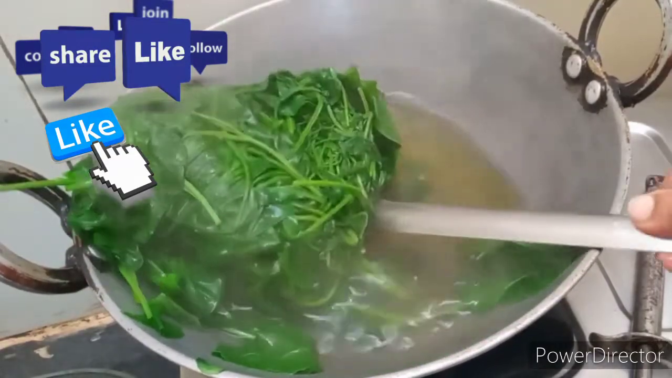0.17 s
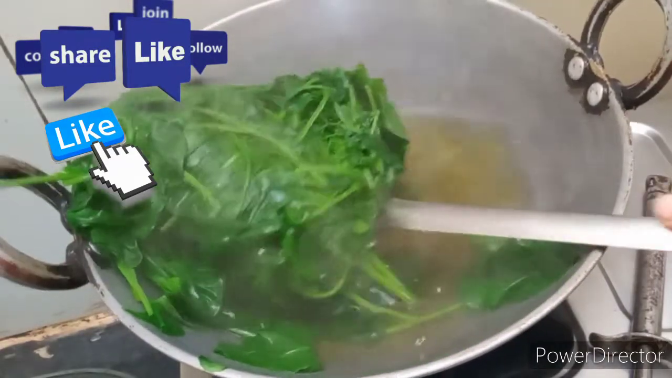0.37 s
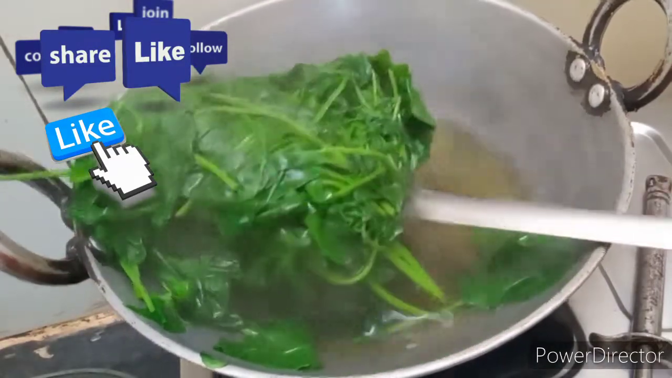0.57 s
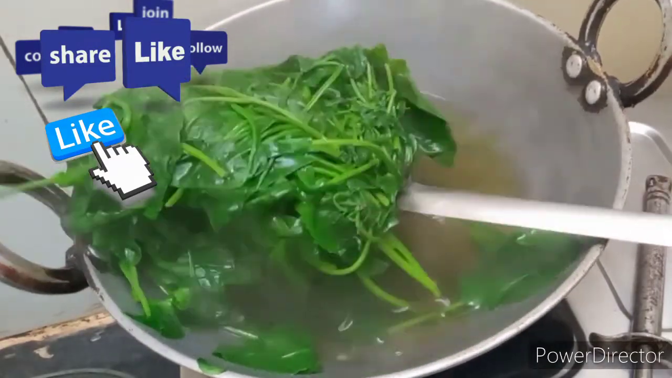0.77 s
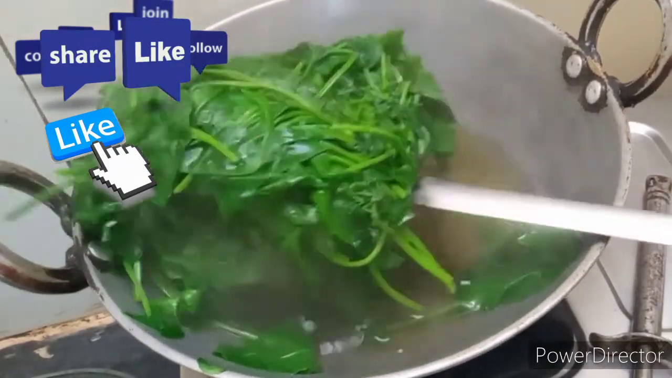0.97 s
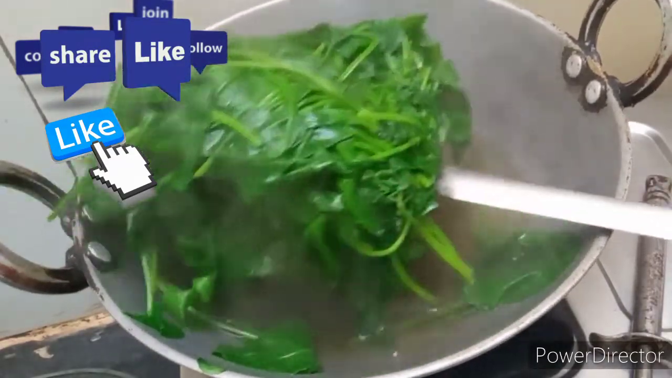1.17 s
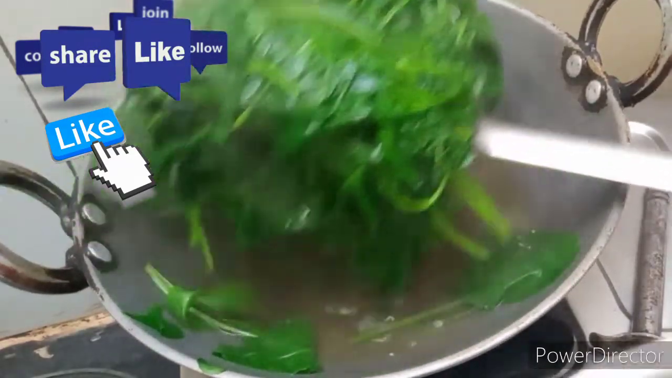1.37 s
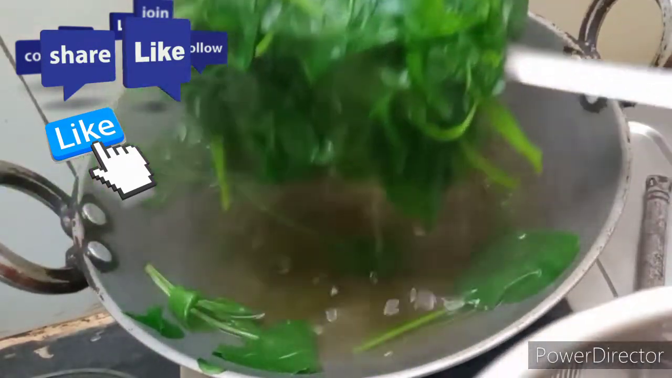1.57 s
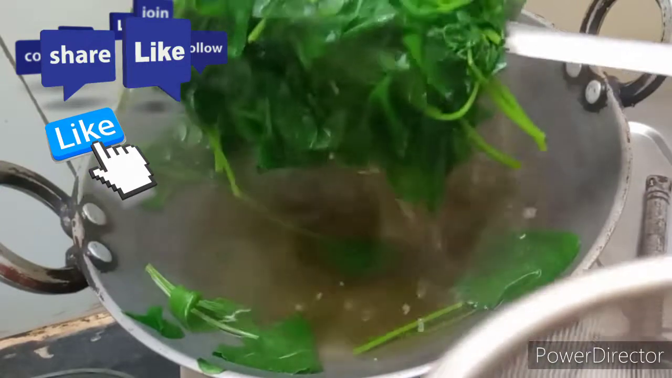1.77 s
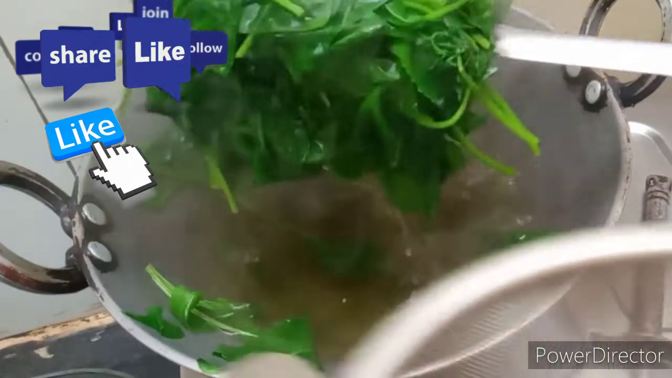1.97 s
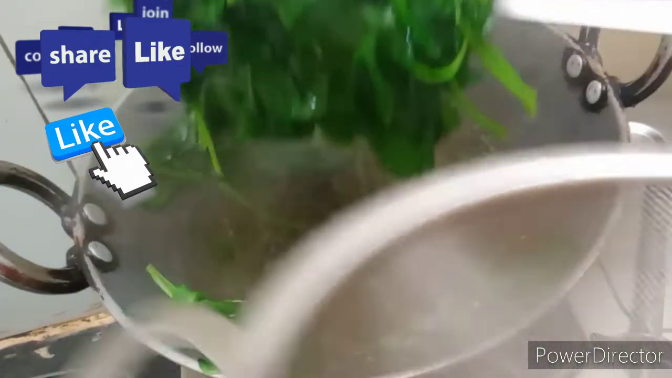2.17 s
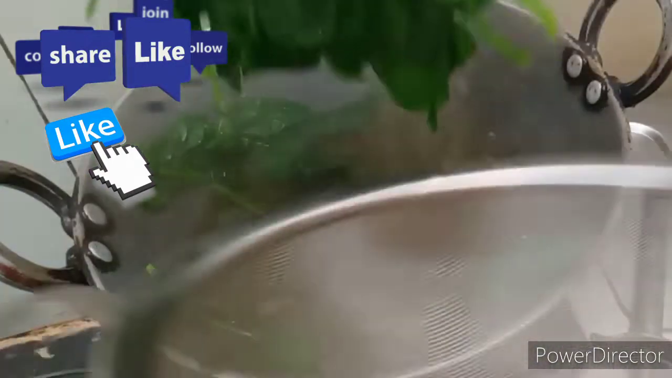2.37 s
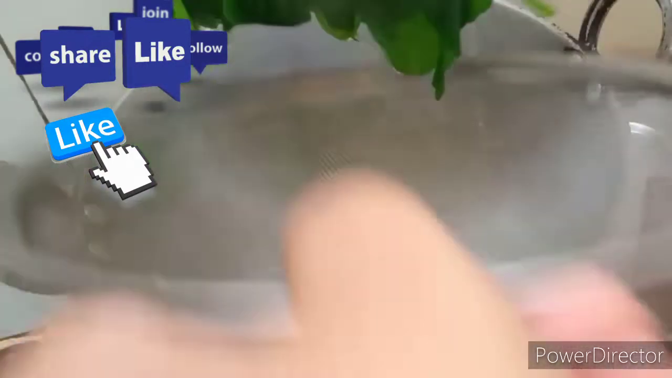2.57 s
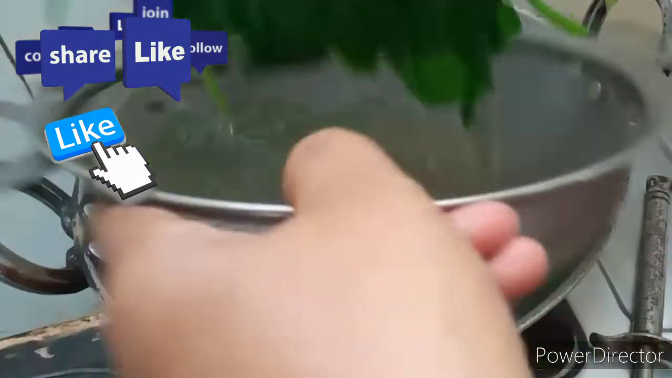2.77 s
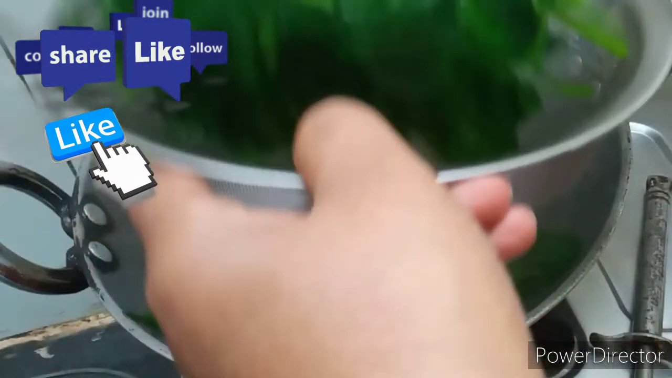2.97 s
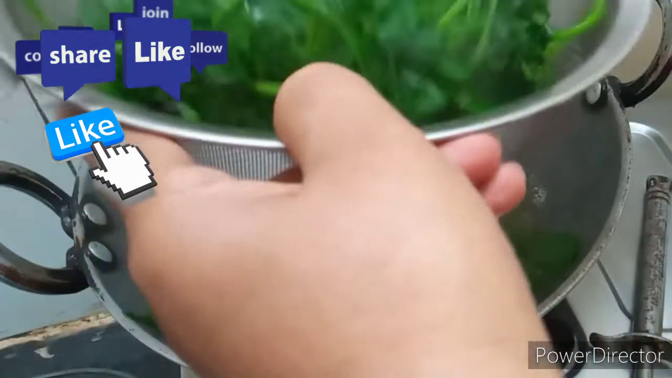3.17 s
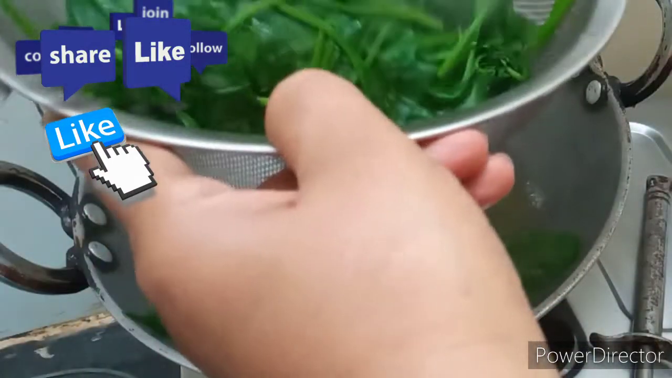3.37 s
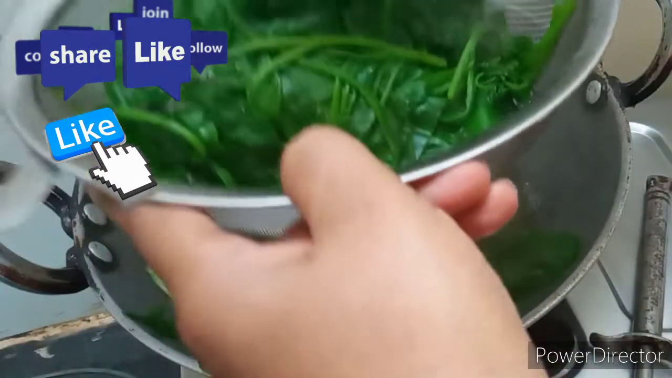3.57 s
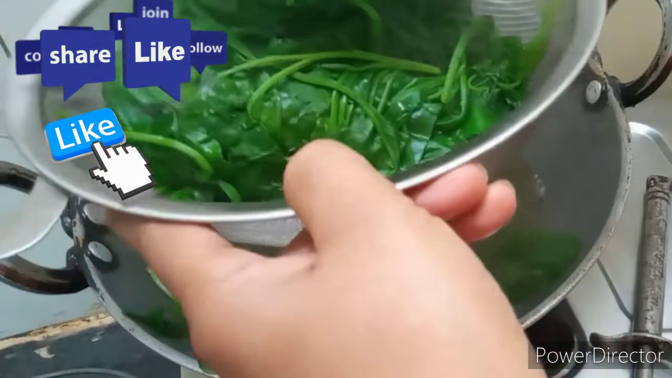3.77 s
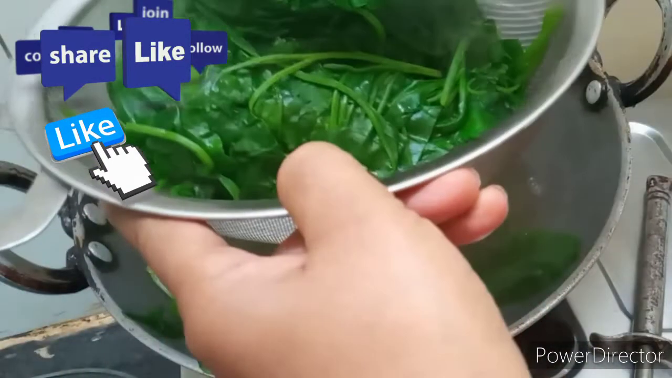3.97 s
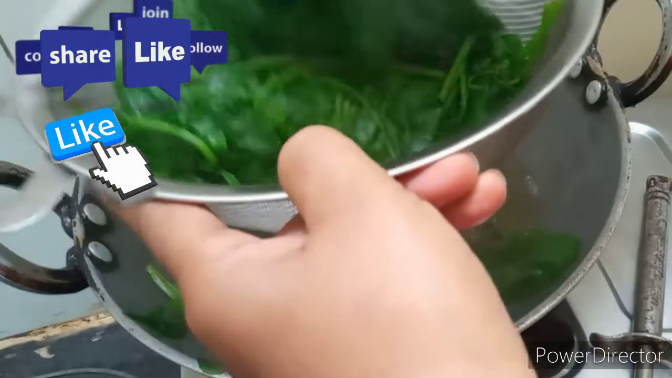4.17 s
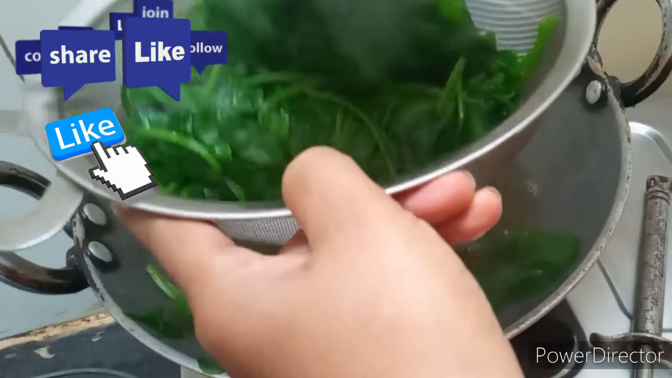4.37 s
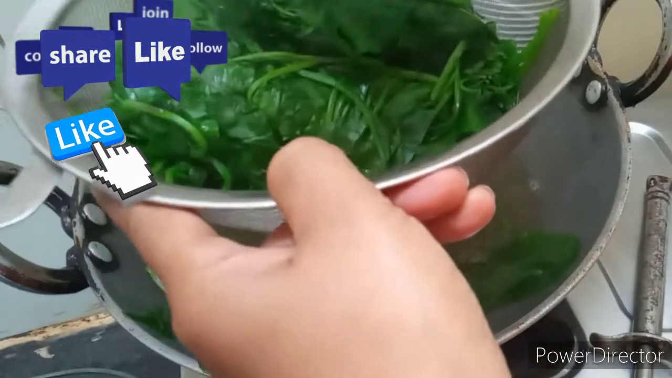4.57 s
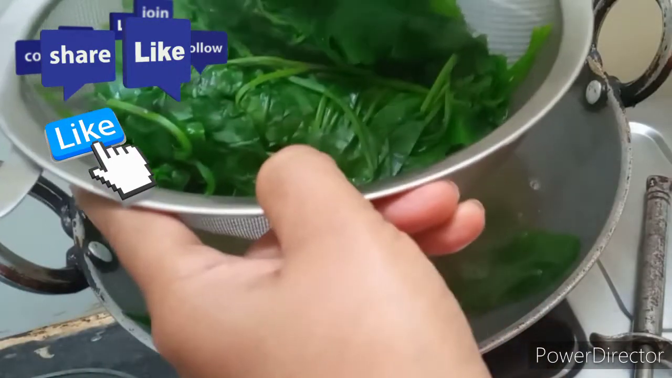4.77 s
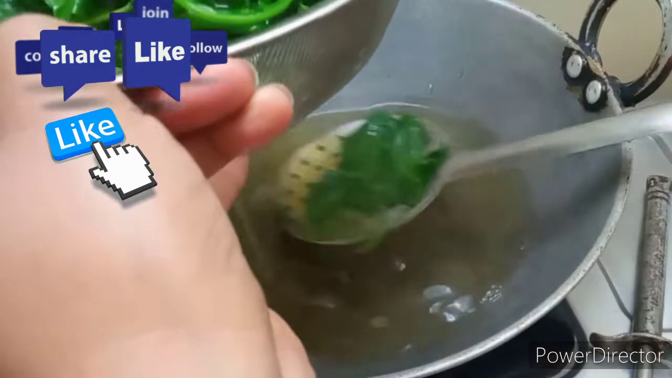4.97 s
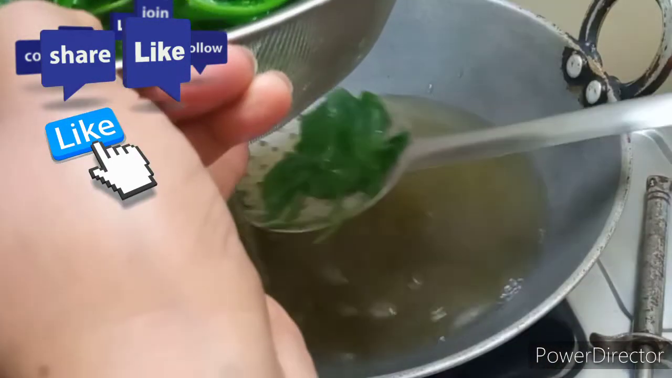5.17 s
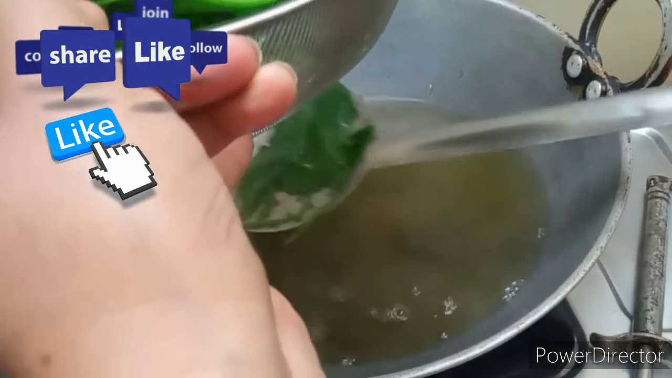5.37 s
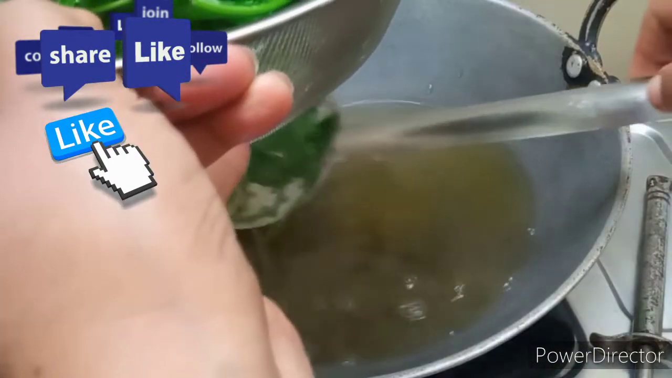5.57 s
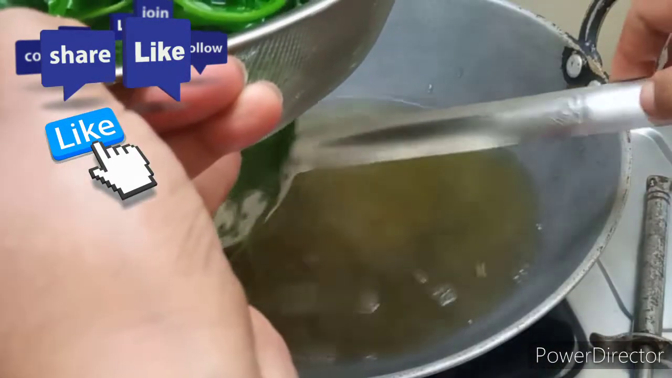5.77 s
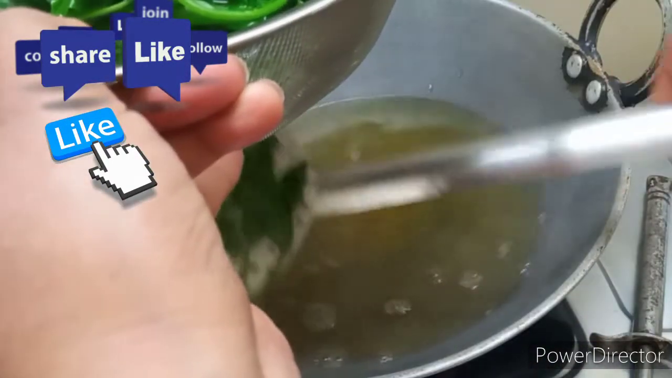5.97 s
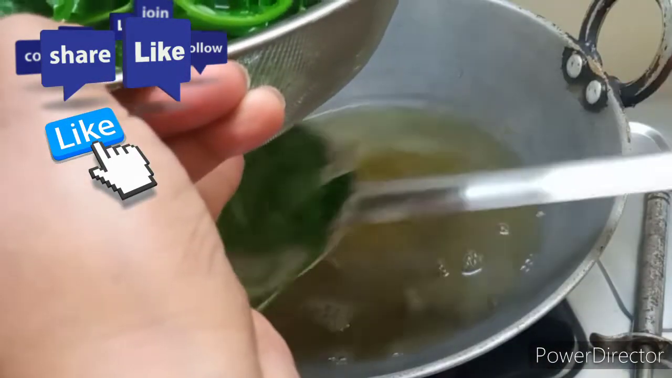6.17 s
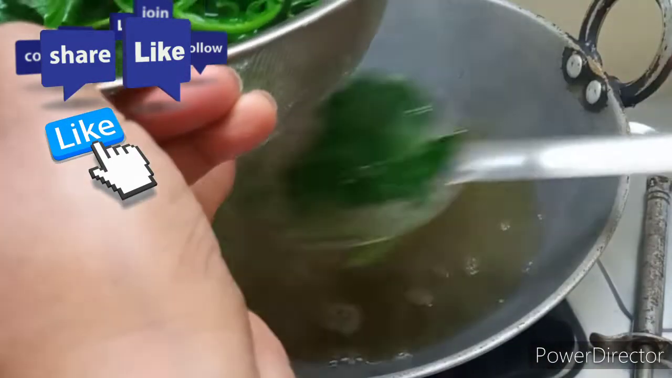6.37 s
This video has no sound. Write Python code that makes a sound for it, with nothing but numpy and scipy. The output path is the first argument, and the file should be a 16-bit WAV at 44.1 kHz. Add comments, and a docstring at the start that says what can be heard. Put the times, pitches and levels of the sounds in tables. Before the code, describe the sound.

In a small hard kitchen a stove murmurs steadily. Sodden greens slap softly into hot water, then drips quicken into a dense patter as they are lifted. A hard bright tap of spoon on wire strainer follows, then wet leaves rustle on mesh with more dripping. Sparse drops lead to a metallic scrape with clinks and a last few light taps. Close single microphone, brittle treble.

```python
"""A stove murmurs under dripping water and a brief scrape of steel, in a small hard kitchen.
Boiled spinach is lifted from a pan of hot water with a slotted steel spoon and tipped into a wire strainer.
Wet clumps flop back as shaped noise with a gulp of air; drops snap, and a short ring follows each snap.
Small slips and hard taps ring the modes of spoon and strainer; films tick and a thin stream whistles.
One microphone hears it all, with a sharp resonance in the treble."""
import sys
import numpy as np
from scipy import signal
from scipy.fft import rfft, irfft
from scipy.io import wavfile

SR = 44100
rng = np.random.default_rng(int(sys.argv[2]) if len(sys.argv) > 2 else 0)


def inscribe(sig):
    """Save sig as 16-bit PCM at rate SR to the path in sys.argv[1].

    A 1-D sig is mono; a 2-D sig holds one channel per row.
    Samples are clipped to [-1, 1] before scaling.
    """
    pcm = np.round(np.clip(np.atleast_2d(sig).T, -1, 1) * 32767)
    wavfile.write(sys.argv[1], SR, pcm.astype(np.int16))


N = 286650
TIME = np.arange(N) / SR
SHORT = TIME[:SR // 4]


def amp(db):
    """Decibels to gain."""
    return 10 ** (np.asarray(db) / 20)


def add(track, s, sound):
    """Mix a sound into the track at a time in seconds."""
    start = int(np.clip(s * SR, 0, N - 1))
    track[start:start + len(sound)] += sound[:N - start]


def highpass(x, hz, order):
    """Remove what lies below an edge."""
    return signal.sosfilt(signal.butter(order, hz, "high", fs=SR, output="sos"), x)


def coloured_noise(spectrum, size):
    """White noise shaped by a curve of gain over frequency."""
    hz, db = np.transpose(spectrum)
    bins_hz = np.maximum(np.fft.rfftfreq(size, 1 / SR), 1)
    gain = amp(np.interp(np.log(bins_hz), np.log(hz), db))
    return irfft(rfft(rng.standard_normal(size)) * gain, size)


def resonate(x, hz, width_hz):
    """One resonance with gain about 1 on top."""
    radius = np.exp(-np.pi * width_hz / SR)
    feedforward = np.array([1, 0, -1]) * (1 - radius * radius) / 2
    feedback = [1, -2 * radius * np.cos(2 * np.pi * hz / SR), radius * radius]
    return signal.lfilter(feedforward, feedback, x)


def body(x, modes):
    """An object's modes, driven side by side."""
    return sum(amp(db) * resonate(x, hz, width_hz) for hz, width_hz, db in modes)


def dying(t, t60):
    """Exponential decay that falls 60 dB in t60 seconds."""
    return np.exp(-np.log(1000) * t / t60)


def snap(hz, size, sharpness=1.28):
    """A very short contact, broadly centred on a pitch."""
    b, a = signal.iirpeak(min(hz, SR / 3), max(sharpness, .8), fs=SR)
    click = signal.lfilter(b, a, signal.unit_impulse(SR // 200))
    return np.pad(click, (0, size - len(click))) * np.sqrt(sharpness)


KITCHEN_T60_S, BASS_T60_S, BASS_HZ = 0.3, 0.32, 694
PAN_ECHO_S, PAN_ECHO_DB = .0008, -4.5   # the delay varies by up to 30 %


def kitchen(x, room_db, build_s=0.0029, early_s=0.031, uneven_db=7.5):
    """Direct sound, an echo off the pan wall, then uneven reflections merging into a tail whose lows last longest."""
    t = TIME[:SR // 3]
    uneven = amp(uneven_db * np.clip(rng.standard_normal(len(t)), -2, 2) * np.exp(-t / early_s))
    echoes = rng.standard_normal(len(t)) * uneven * (1 - np.exp(-t / build_s))
    lows = signal.sosfilt(signal.butter(1, BASS_HZ, fs=SR, output="sos"), echoes)
    tail = lows * dying(t, BASS_T60_S) + (echoes - lows) * dying(t, KITCHEN_T60_S)
    response = amp(room_db) * tail / np.linalg.norm(tail)
    response[0] += 1   # direct sound
    response[int(PAN_ECHO_S * SR * rng.uniform(.7, 1.3))] += amp(PAN_ECHO_DB)
    return signal.fftconvolve(x, response)[:N]


STROKE_ATTACK_S, STROKE_RELEASE_T60_S = 0.018, 0.12   # shared by rubbing and whistles


def stroke(s, length_s):
    """Pressure builds, holds until the stroke's length is over and lets go."""
    t = TIME - s
    attack = np.clip(t / STROKE_ATTACK_S, 0, 1)
    return attack * dying(np.clip(t - length_s, 0, 1), STROKE_RELEASE_T60_S)


MURMUR_DB, MURMUR_FADE_DB_PER_S = 1, .5   # start level on top of the spectrum
DRONE_DB, DRONE_FADE_DB_PER_S = -59.5, .5
PAN_HZ, PAN_WIDTH_HZ = 293.25, 1.4
HUM_HZ, HUM_DB = 100.6, -69.5
# murmur of the stove and the hot water: pitch_hz [Hz], level_db [dB, gain on white noise]
STOVE_SPECTRUM = [(15, -46), (30, -54), (60, -50), (100, -40), (160, -37), (220, -44.5), (400, -41),
                  (700, -44.5), (1200, -50), (2000, -53.5), (4000, -55.5), (6500, -63), (9000, -63),
                  (15000, -59)]


def stove():
    """A murmur and the pan droning on one narrow mode, both slowly fading, and a faint wavering hum."""
    murmur_db = MURMUR_DB - MURMUR_FADE_DB_PER_S * TIME
    drone_db = DRONE_DB - DRONE_FADE_DB_PER_S * TIME
    murmur = amp(murmur_db) * coloured_noise(STOVE_SPECTRUM, N)
    drone = resonate(rng.standard_normal(N), PAN_HZ, PAN_WIDTH_HZ)
    hum = resonate(rng.standard_normal(N), HUM_HZ, width_hz=5.7)
    return murmur + amp(drone_db) * drone / drone.std() + amp(HUM_DB) * hum / hum.std()


def drop(snap_db, snap_hz, ring_hz, ring_db, cycles=11, rise=0.029):
    """A drop snaps on impact; a short ring follows the snap, rising slightly in pitch."""
    t, life_s = TIME[:SR // 25], cycles / ring_hz
    pitch_hz = ring_hz * (1 + rise * np.minimum(t / life_s, 1))
    ring = np.sin(2 * np.pi * np.cumsum(pitch_hz) / SR) * dying(t, life_s)
    return amp(snap_db) * snap(snap_hz, len(t)) + amp(ring_db) * ring


TRICKLE_DB = -60   # the flow when the leaves barely drip
DRIPS_PER_S, DRIP_DB = 65, -32   # number of small drops and level of the biggest, at a trickle
RATE_FOLLOWS, SIZE_FOLLOWS = .8, 1.73   # dB gained per dB of flow
# water running off the leaves, strongest under the lifted spoon and under the full strainer:
# start_s [s], level_db [dB]
WATER_FLOW = [(0.0, -60), (1.21, -59), (1.36, -56), (1.76, -58), (2.18, -51), (2.61, -52), (2.85, -59),
              (3.41, -59.5), (3.72, -54.5), (4.01, -53.5), (4.26, -60), (4.84, -59), (5.22, -59.5),
              (5.45, -60.5)]


def flow_above_trickle():
    """The flow in dB over a trickle, at every sample."""
    s, flow_db = np.transpose(WATER_FLOW)
    return np.interp(TIME, s, flow_db) - TRICKLE_DB


def random_moments(per_s):
    """Sample positions of independent events at a changing rate."""
    return np.flatnonzero(rng.random(N) < per_s / SR)


def drizzle(snap_hz=2300, snap_octaves=0.64, ring_hz=1400, ring_octaves=0.697,
            ring_db=-15, spread_db=4, room_db=-2.0):
    """Small drops of random size fall at random moments; more flow makes them more frequent and larger."""
    flow_db = flow_above_trickle()
    biggest_db = DRIP_DB + SIZE_FOLLOWS * flow_db
    born = random_moments(DRIPS_PER_S * amp(RATE_FOLLOWS * flow_db))
    chances = np.clip(rng.standard_normal((len(born), 3)), -2, 2)
    out = np.zeros(N)
    for i, (size, sharp, high) in zip(born, chances):
        db = biggest_db[i] + spread_db * (size - 2)
        drip_snap_hz = snap_hz * 2 ** (snap_octaves * sharp)
        drip_ring_hz = ring_hz * 2 ** (ring_octaves * high)
        add(out, i / SR, drop(db, drip_snap_hz, drip_ring_hz, db + ring_db, cycles=7.3))
    return kitchen(out, room_db)


def friction(slips_per_s, catch_hz=160, catch_db=4):
    """Tiny slips of random size, stronger and weaker as the surfaces catch and let go; rms 1."""
    knots = np.arange(0, N / SR + 1, 1 / catch_hz)
    catches = np.clip(rng.standard_normal(len(knots)), -2, 2)
    grip = amp(catch_db * np.interp(TIME, knots, catches))
    slips = (rng.random(N) < slips_per_s / SR) * rng.standard_normal(N) * grip
    return slips / slips.std()


# modes of the steel spoon: pitch_hz [Hz], width_hz [Hz], level_db [dB]
SPOON_MODES = [(304, 15, 0.5), (395, 99, -2.5), (883, 44, -0.5), (1150, 230, -10.5), (1578, 46, -2.5),
               (1930, 100, -7.5), (2578, 54, 3.5), (2920, 85, -4.5), (3330, 220, -8.5), (3820, 110, -1),
               (4220, 250, -3), (5120, 130, -5), (5930, 71, -9), (6470, 80, -3), (7150, 85, -5.5),
               (7840, 27, -1), (9300, 56, -12), (9900, 380, -17), (11900, 110, -9), (14500, 200, -7)]
# modes of the wire strainer: pitch_hz [Hz], width_hz [Hz], level_db [dB]
STRAINER_MODES = [(2310, 30, 8), (2827, 47, 8.5), (3260, 480, 1.5), (4010, 74, 7), (5080, 51, -1),
                  (6100, 70, -5), (6370, 50, 5), (7700, 52, -4), (8400, 25, -1), (9620, 70, 7)]
# strokes of the spoon along a rim: start_s [s], length_s [s], level_db [dB, drive of the slips]
RIM_SLIDES = [(0.025, 0.094, -53.5), (5.549, 0.069, -40.5), (5.659, 0.1, -34.5), (5.864, 0.028, -43.5)]
# pushes of the leaves over the mesh:
# start_s [s], length_s [s], rustle_db [dB, before mesh_db], ring_db [dB, drive of the mesh]
LEAF_PUSHES = [(3.46, 0.088, -40, -39), (3.614, 0.057, -47, -57), (3.682, 0.1, -45, -61),
               (3.962, 0.28, -54, -54.5), (4.557, 0.14, -54.5, -55)]


def scrapes(grit_db=-11, ring_db=3, mesh_db=-2, room_db=0):
    """Slips drive the spoon on the rim and the mesh under wet leaves; their bright grit also sounds on its own,
    beside the modes, in the same room."""
    slide = sum(amp(db) * stroke(s, length_s) for s, length_s, db in RIM_SLIDES)
    rustle = sum(amp(db) * stroke(s, length_s) for s, length_s, db, _ in LEAF_PUSHES)
    press = sum(amp(db) * stroke(s, length_s) for s, length_s, _, db in LEAF_PUSHES)
    rim = slide * friction(slips_per_s=1700)
    rub = friction(slips_per_s=1600)
    spoon = amp(ring_db) * body(rim, SPOON_MODES) + amp(grit_db) * highpass(rim, 2500, order=1)
    mesh = body(press * rub, STRAINER_MODES) + highpass(rustle * rub, 6660, order=1)
    return kitchen(spoon + amp(mesh_db) * mesh, room_db)


FILMS_PER_S = 14   # at a trickle
FILM_DB, FILM_SPREAD_DB, FILM_HZ = -34, 12, 9500   # loudest pop, spread below it, middle pitch


def films(octaves=.5, room_db=0):
    """Films of water pop on the leaves as faint bright ticks, more often the more water runs off."""
    born = random_moments(FILMS_PER_S * amp(RATE_FOLLOWS * flow_above_trickle()))
    out = np.zeros(N)
    for i, (small, high) in zip(born, rng.random((len(born), 2))):
        pop_hz = FILM_HZ * 2 ** (octaves * (2 * high - 1))
        add(out, i / SR, amp(FILM_DB - FILM_SPREAD_DB * small) * snap(pop_hz, len(SHORT)))
    return kitchen(out, room_db)


# the big drops and bursting films: start_s [s], snap_db [dB], snap_hz [Hz],
# ring_hz [Hz], ring_db [dB], room_db [dB relative to direct sound]
BIG_DROPS = [(.4744, -32, 4700, 4800, -46, 2), (1.4734, -25, 1490, 1180, -37, 7.5),
             (1.577, -29.5, 11400, 10100, -32.5, 6), (1.719, -22.5, 13000, 6540, -40, 3),
             (1.7517, -19.5, 3080, 2620, -36, 0), (1.8001, -17.5, 3000, 1500, -35, 1.5),
             (1.8723, -23, 3580, 4170, -35.5, 2.5), (1.934, -21, 4000, 3200, -35, 4),
             (2.168, -13, 13000, 4740, -26.5, 5), (2.1978, -8, 1210, 745, -27, 3),
             (2.2073, -6, 1200, 780, -24, -7), (2.2447, -11.5, 1200, 930, -33, -6),
             (2.3117, -21, 9700, 6800, -24, 1.5), (2.3646, -16, 6500, 866, -38, -4),
             (2.3848, -13.5, 6270, 13400, -10.5, -1.5), (2.41, -20, 9000, 3070, -31.5, 0),
             (2.441, -19, 9000, 5730, -35, 2), (2.553, -9, 1560, 775, -30.5, 2.5),
             (2.5738, -11.5, 3300, 1320, -26, -1), (2.6067, -9, 3500, 2360, -19.5, -1),
             (2.666, -9.5, 12900, 7100, -28, 2.5), (2.704, -8.5, 1160, 1070, -29.5, 2.5),
             (2.8571, -16, 5500, 3670, -29.5, 3.5), (3.6754, -18.5, 3160, 760, -38.5, 5),
             (3.9555, -21.5, 2940, 1040, -42, 4), (3.995, -25.5, 8500, 4300, -39, 1),
             (4.0743, -24.5, 4000, 1060, -35.5, 4.5), (4.118, -22, 3900, 2800, -35, -2),
             (4.2123, -25, 4360, 1430, -38.5, 3), (4.3012, -37, 9100, 12300, -33, 5.5),
             (4.501, -22, 3100, 1470, -36.5, 5), (4.572, -26, 13000, 6500, -31, -2),
             (4.7458, -35, 8400, 8300, -32, 2.5), (4.7876, -11.5, 8350, 3900, -21.5, 1),
             (4.8651, -52, 4000, 3950, -29.5, -1), (4.9119, -20, 9800, 1360, -36, 4.5),
             (4.943, -29, 6300, 4150, -32.5, 4.5), (5.089, -13, 3130, 1350, -38, 1),
             (5.157, -35, 3560, 11700, -25, 4), (5.167, -30, 13000, 10100, -37, 2.5),
             (5.189, -23, 11300, 6600, -40, 2), (5.319, -22.5, 3000, 1080, -39.5, 3),
             (5.3373, -32, 4100, 2560, -35.5, 2), (5.409, -23, 11400, 3800, -31, 4),
             (5.4285, -26.5, 9700, 2430, -32, 1), (5.4697, -25, 8400, 1420, -34.5, 3.5)]


def drops():
    """The larger drops and films, each with its own reflections from its own spot in the pan."""
    out = np.zeros(N)
    for s, snap_db, snap_hz, ring_hz, ring_db, room_db in BIG_DROPS:
        add(out, s, kitchen(drop(snap_db, snap_hz, ring_hz, ring_db), room_db))
    return out


POCKET_DB, FLOP_ROOM_DB = -9.5, 1.5   # the gulp relative to its slap; room relative to direct sound
# wet clumps flopping into the pan: start_s [s], level_db [dB], t60_s [s], treble_db [dB, splash],
# pan_db [dB, ring], pocket_hz [Hz, air pocket], bass_hz [Hz, lower edge]
CLUMP_FLOPS = [(0.691, -27.5, 0.28, -8, 4, 475, 130), (1.218, -13.5, 0.058, -0.5, -24, 590, 55),
               (1.405, -24, 0.063, -16, -7, 910, 250), (2.052, -12, .04, -2.5, -7.5, 460, 70),
               (6.01, -34, 0.14, -22, -13, 710, 150)]
# colour of a flop: pitch_hz [Hz], level_db [dB, gain on white noise]
FLOP_SPECTRUM = [(30, -20), (60, 1), (120, -9), (250, -8), (500, -9), (800, -5.5), (1400, -8), (2500, -15),
                 (4000, -10), (7000, -18.5), (10000, -17), (15000, -20)]
# modes of the pan with water in it: pitch_hz [Hz], width_hz [Hz], level_db [dB]
PAN_MODES = [(167, 11, 1), (424, 59, 11.5), (590, 140, 8), (765, 130, 0.5), (1220, 62, -15),
             (1970, 130, -3), (2370, 330, 9.5)]


def flops(splash_hz=3500, pocket_t60=0.02):
    """A soft mass slaps the water: a thud that shakes the pan, a gulp of trapped air and a spray of treble."""
    out = np.zeros(N)
    lowpass = signal.butter(2, splash_hz, fs=SR, output="sos")
    for s, db, t60_s, treble_db, pan_db, pocket_hz, bass_hz in CLUMP_FLOPS:
        slap = amp(db) * coloured_noise(FLOP_SPECTRUM, len(SHORT)) * dying(SHORT, t60_s)
        thud = signal.sosfiltfilt(lowpass, slap)
        spray = amp(treble_db) * (slap - thud)
        pan_ring = amp(pan_db) * body(slap, PAN_MODES)
        gulp = amp(db + POCKET_DB) * np.sin(2 * np.pi * pocket_hz * SHORT) * dying(SHORT, pocket_t60)
        flop = highpass(thud + spray + pan_ring + gulp, bass_hz, order=2)
        add(out, s, kitchen(flop, FLOP_ROOM_DB))
    return out


# faint whistles of a thin stream meeting the water: start_s [s], length_s [s], pitch_hz [Hz], level_db [dB]
STREAM_WHISTLES = [(1.872, .04, 1353, -53), (2.238, 0.028, 1424, -52)]


def whistles(width_hz=25):
    """The stream excites a narrow, wavering note in the water."""
    out = np.zeros(N)
    for s, length_s, hz, db in STREAM_WHISTLES:
        note = resonate(resonate(rng.standard_normal(N), hz, width_hz), hz, width_hz)
        out += amp(db) * stroke(s, length_s) * note / note.std()
    return out


TAP_ROOM_DB = 4.5   # room relative to direct sound
# spoon against the strainer: start_s [s], snap_db [dB], snap_hz [Hz], ring_db [dB, spoon], ping_hz [Hz, wire],
# ping_db [dB], gap_s [s, between bounces], loss_db [dB per bounce]
SPOON_TAPS = [(3.0759, 2, 9000, -12, 3400, -36.5, 0.0077, 12),
              (5.539, -11, 6940, 0.5, 2670, -48, 0.038, 14),
              (5.8764, -17.5, 11400, -10, 5366, -45, .012, 14),
              (6.285, -25, 8500, -40, 5630, -48, 0.014, 18),
              (6.486, -17.5, 4380, -37, 4440, -34, 0.014, 14)]


def taps(ping_t60=0.045, second_ratio=0.9, second_db=-7, count=4):
    """Steel meets steel: a hard snap, the spoon's modes and a two-note wire ping, repeated in dying bounces."""
    out = np.zeros(N)
    spoon = body(signal.unit_impulse(len(SHORT)), SPOON_MODES)
    for s, snap_db, snap_hz, ring_db, ping_hz, ping_db, gap_s, loss_db in SPOON_TAPS:
        phase = 2 * np.pi * ping_hz * SHORT
        two_notes = np.sin(phase) + amp(second_db) * np.sin(second_ratio * phase)
        ping = two_notes * dying(SHORT, ping_t60)
        contact = amp(snap_db) * snap(snap_hz, len(SHORT), sharpness=1.56)
        hit = contact + amp(ring_db) * spoon + amp(ping_db) * ping
        for k in range(count):
            add(out, s + k * gap_s, kitchen(amp(-k * loss_db) * hit, TAP_ROOM_DB))
    return out


def scene():
    """All sources at one microphone."""
    background = stove() + drizzle() + films()
    events = scrapes() + drops() + flops() + whistles() + taps()
    return (background + events)[None]


MIC_LOW_HZ, MIC_TOP, CUTOFF_HZ = 47.6, 0.86, 15550   # bass edge, ceiling of the rounding, treble edge
MIC_HZ, MIC_WIDTH_HZ, MIC_DB = 8100, 924, 15   # the resonance added to the plain sound


def record(dry):
    """The microphone drops the deep bass, rings in the treble and rounds hard peaks; the top is cut steeply."""
    thin = highpass(dry, MIC_LOW_HZ, order=2)
    coloured = thin + amp(MIC_DB) * resonate(thin, MIC_HZ, MIC_WIDTH_HZ)
    rounded = MIC_TOP * np.tanh(coloured / MIC_TOP)
    return signal.sosfilt(signal.ellip(12, .2, 75, CUTOFF_HZ, fs=SR, output="sos"), rounded)


dry = scene()
out = record(dry)
inscribe(out)
```